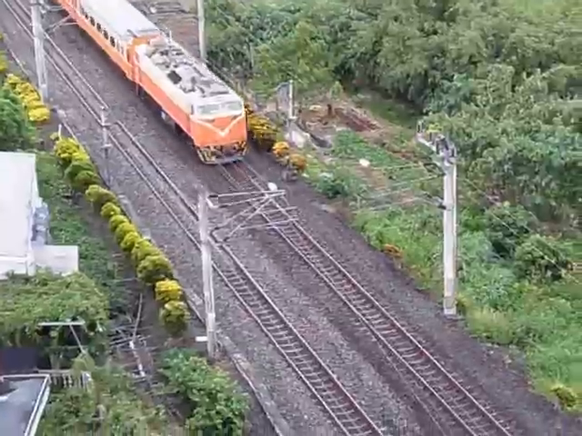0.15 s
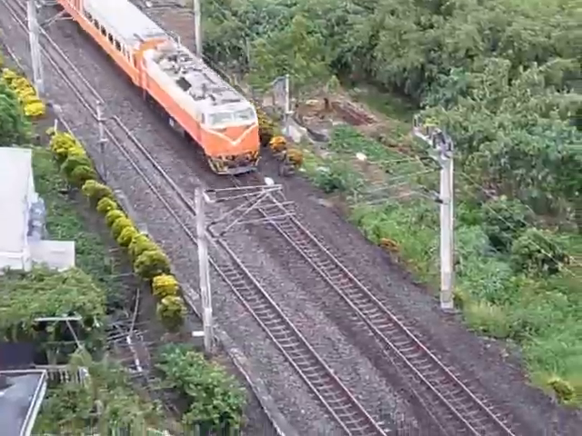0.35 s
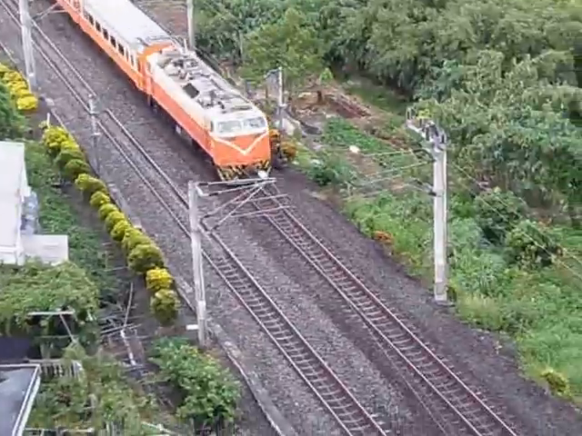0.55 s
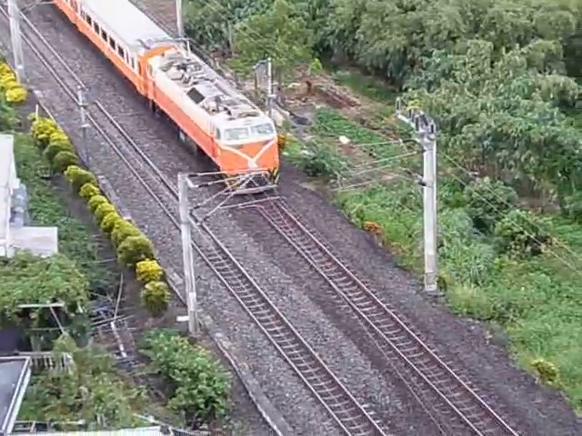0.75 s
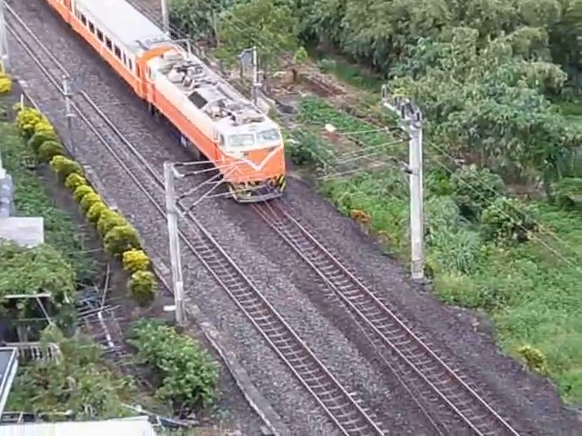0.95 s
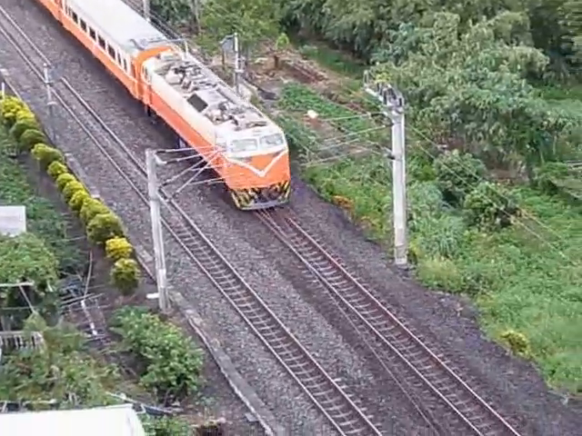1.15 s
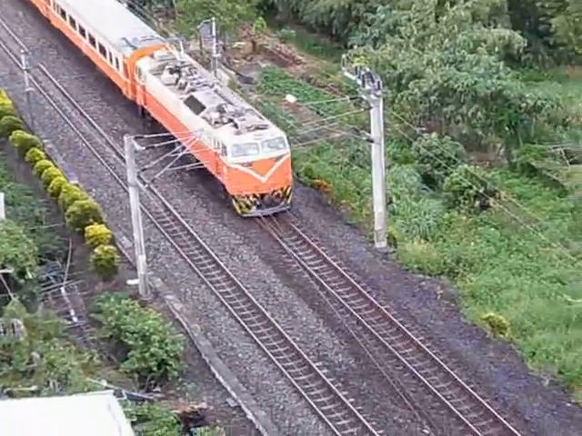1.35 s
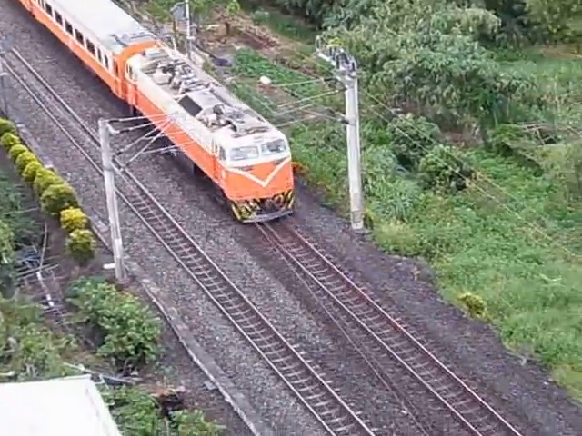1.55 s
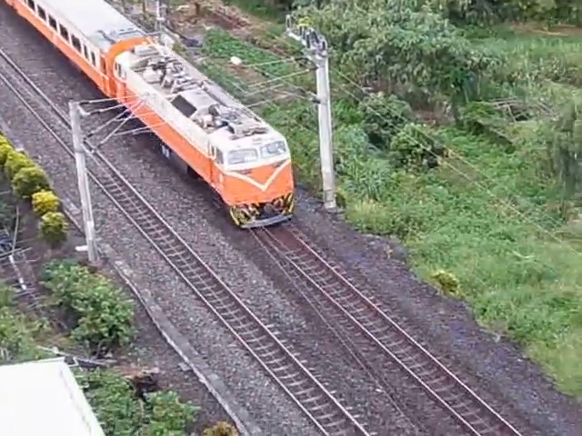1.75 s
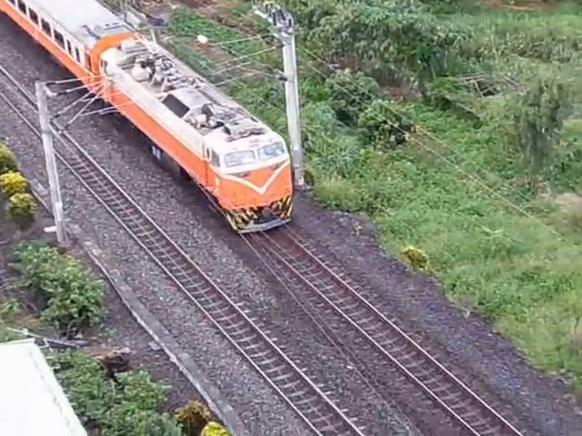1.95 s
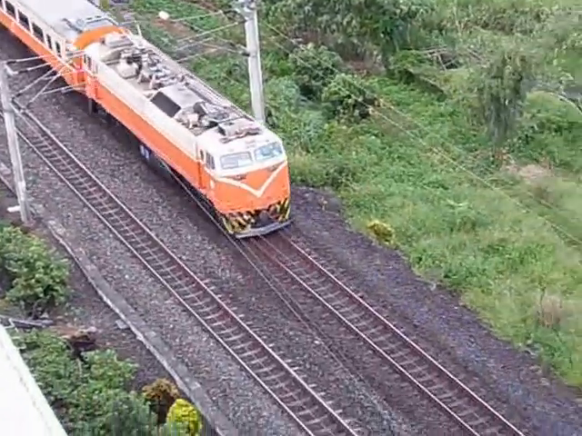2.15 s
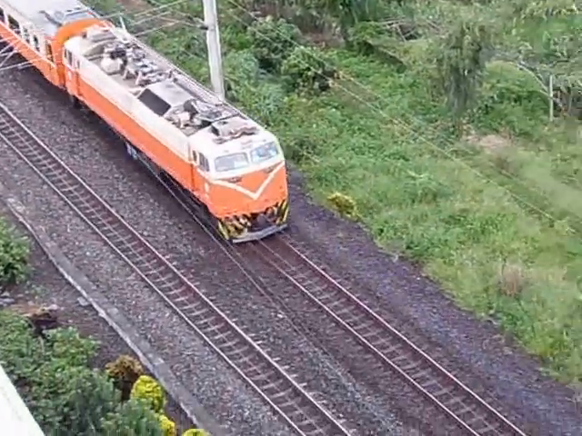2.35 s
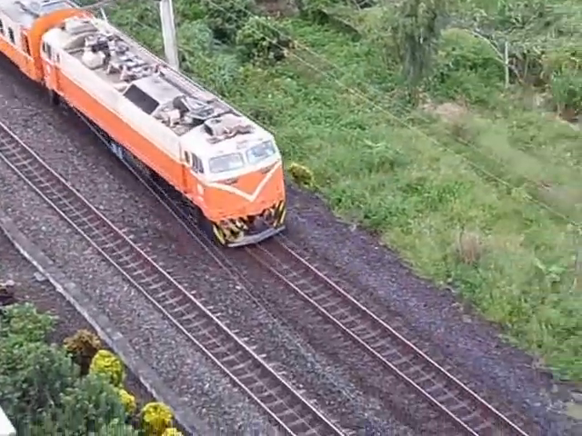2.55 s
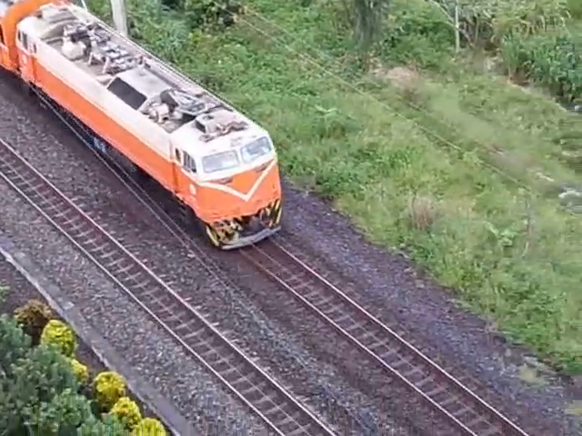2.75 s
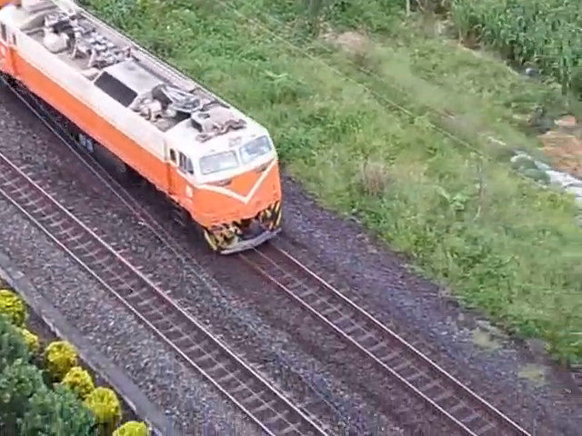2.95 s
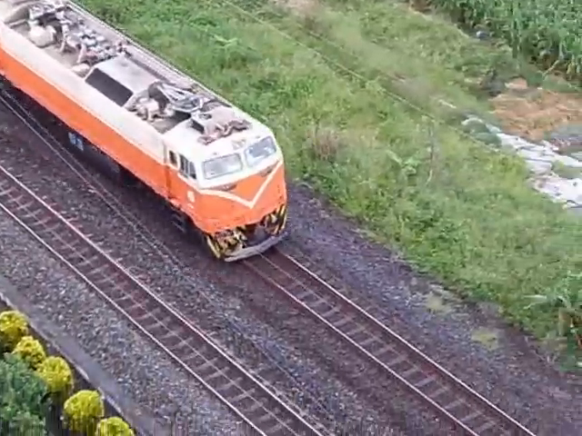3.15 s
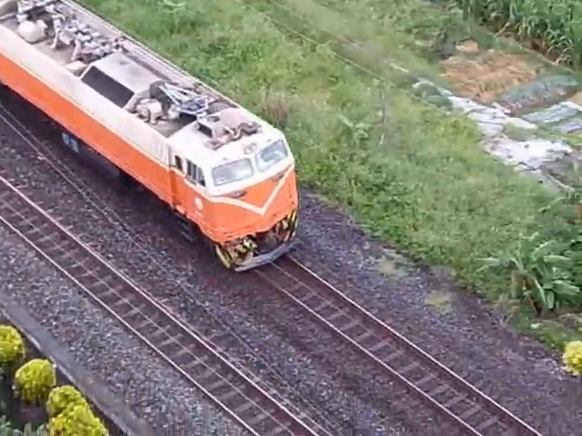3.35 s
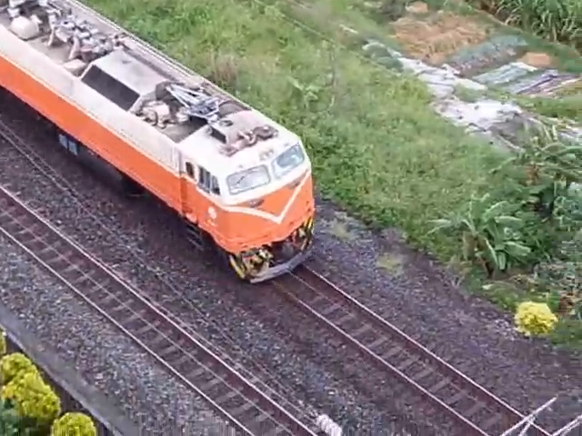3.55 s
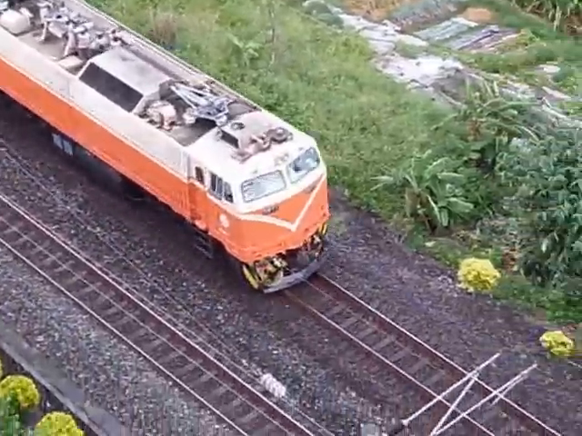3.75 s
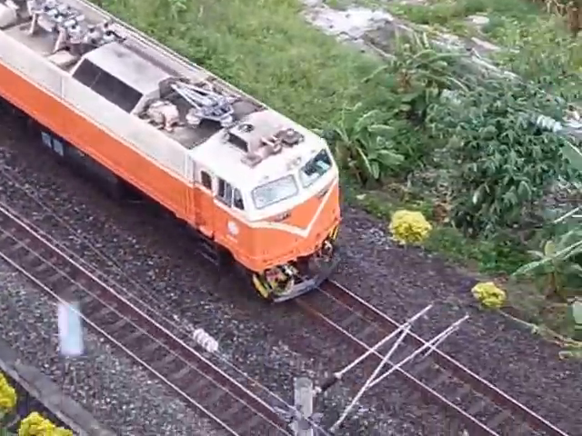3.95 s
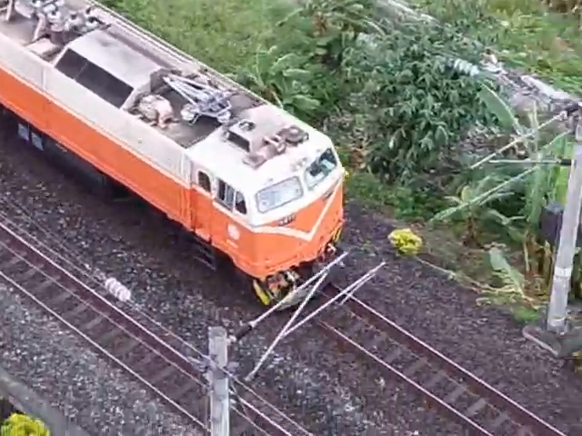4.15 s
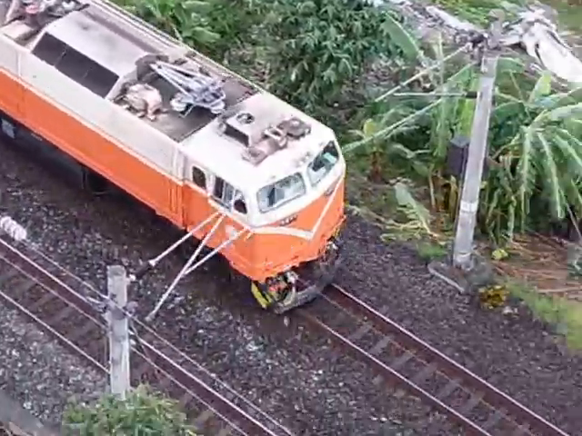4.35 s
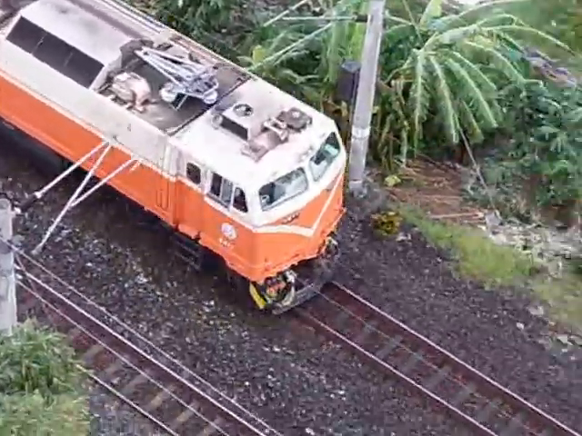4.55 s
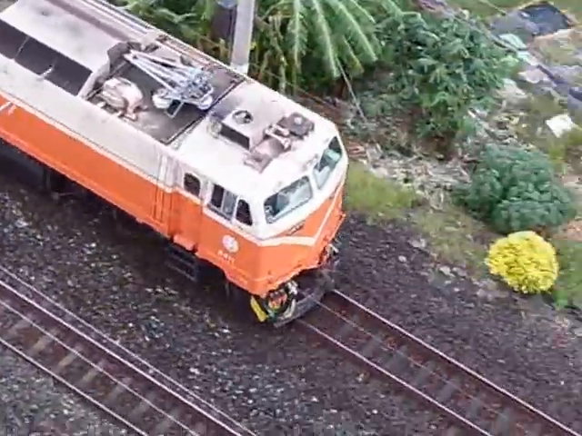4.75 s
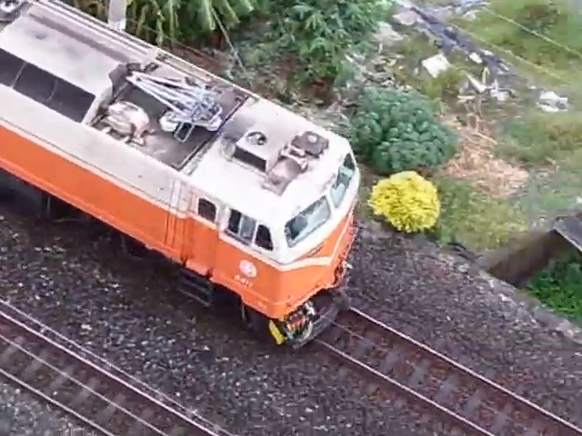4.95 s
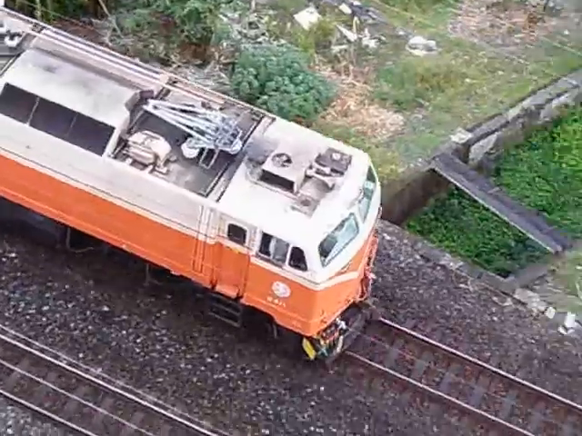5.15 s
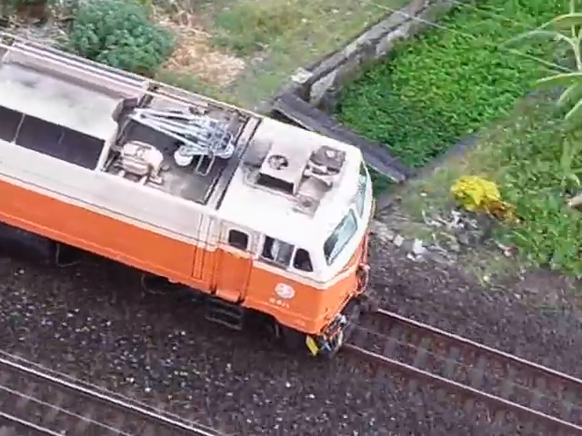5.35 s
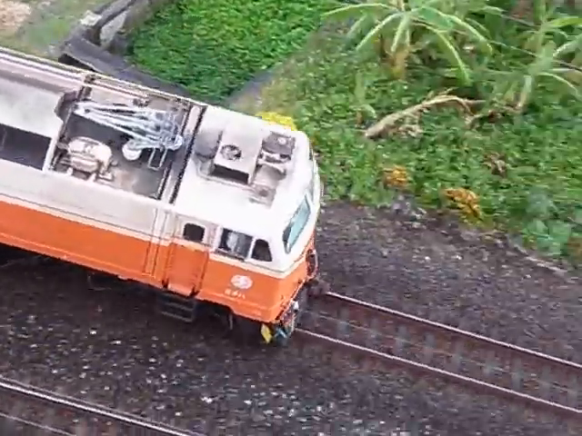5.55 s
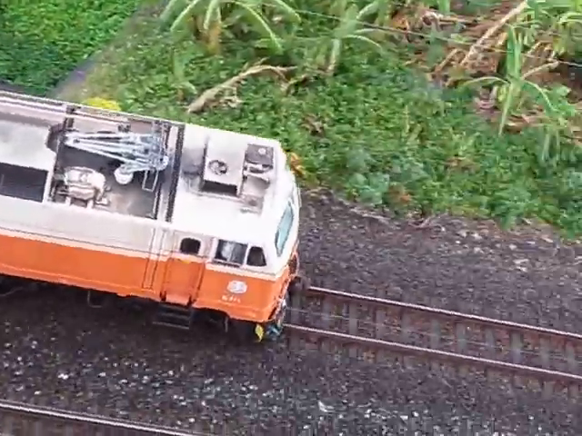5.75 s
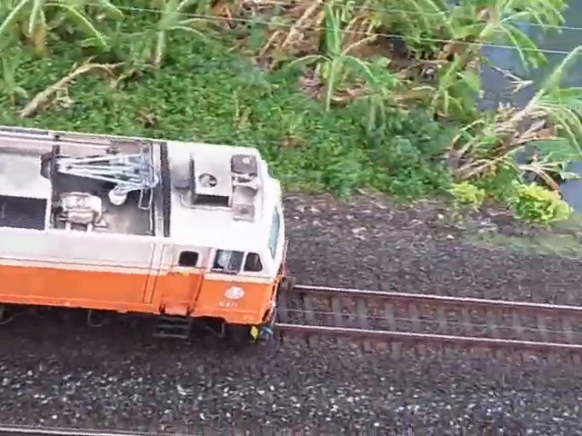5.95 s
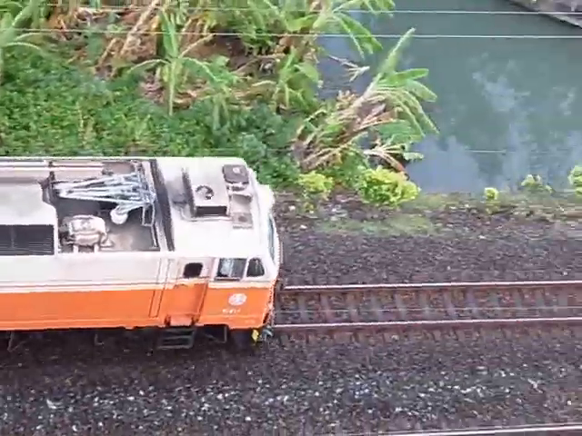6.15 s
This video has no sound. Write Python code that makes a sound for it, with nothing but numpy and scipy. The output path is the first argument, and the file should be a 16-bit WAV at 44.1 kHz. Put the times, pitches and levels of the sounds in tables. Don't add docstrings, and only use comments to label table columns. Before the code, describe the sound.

An electric train approaches on ballasted track, its rails singing and motors humming, swelling into a rough wheel roar with joint knocks and ticks.

```python
import sys
import numpy as np
from scipy import signal
from scipy.fft import rfft, irfft
from scipy.io import wavfile
from scipy.ndimage import uniform_filter1d, map_coordinates

SR = 44100
rng = np.random.default_rng(int(sys.argv[2]) if len(sys.argv) > 2 else 0)


def gain_from_decibels(decibels):
    exponent = np.asarray(decibels, float) / 20
    return 10 ** exponent


def store_wav(level_fs):
    pcm = np.round(np.clip(np.atleast_2d(level_fs), -1, 1) * 32767)
    wavfile.write(sys.argv[1], SR, pcm.T.astype(np.int16))


N = 276948


def rms_one(x):
    return x / np.sqrt(np.mean(x ** 2) + 1e-20)


def resonance(x, hz, width_hz):
    r = np.exp(-np.pi * width_hz / SR)
    zeros = np.array([1, 0, -1]) * (1 - r * r) / 2
    poles = [1, -2 * r * np.cos(2 * np.pi * hz / SR), r * r]
    return signal.lfilter(zeros, poles, x)


def narrow_noise(hz, width_hz, size):
    x = resonance(rng.standard_normal(size), hz, width_hz)
    x = rms_one(resonance(x, hz, 2 * width_hz))
    return rms_one(x / np.sqrt(uniform_filter1d(x * x, size=6000) + .08))


def waver(per_s, size):
    return np.interp(np.arange(size) / SR * per_s, np.arange(400), rng.standard_normal(400))


FRAME = 2048
EVENNESS = .5


def rolling_noise(spectrum, patchy_db, patch_s, patch_hz):
    hz, s, bins = signal.stft(rng.standard_normal(N + FRAME), SR, nperseg=FRAME)
    points = np.array(spectrum)
    colour_db = np.interp(np.log(hz + 1), np.log(points[:, 0]), points[:, 1], left=-150, right=-150)
    coarse = rng.standard_normal((200, 200))
    where = np.meshgrid(hz / patch_hz, s / patch_s, indexing="ij")
    patches = map_coordinates(coarse, where, order=1, mode="mirror")
    local = uniform_filter1d(np.abs(bins) ** 2, size=5, axis=0)
    local = uniform_filter1d(local, size=9, axis=1)
    even = bins / local ** (EVENNESS / 2)
    shaped = even * gain_from_decibels(colour_db[:, None] + patchy_db * patches)
    return rms_one(signal.istft(shaped, SR, nperseg=FRAME)[1][FRAME // 2:N + FRAME // 2])


# time_s, level_db
NEARNESS = [
    (0, -25),
    (1.2, -24),
    (2.4, -23),
    (3.8, -21.5),
    (4.4, -20),
    (5.0, -18),
    (5.7, -18),
    (6.28, -16.5),
]


def facing(turn, shadow_db):
    facing_s, level_db, rise, fall, round_db = turn
    t = np.arange(N) / SR
    late_s, round_db = t - facing_s, max(round_db, .3)
    lost_db = round_db * np.logaddexp(-rise * late_s / round_db, fall * late_s / round_db)
    near_s, near_db = np.transpose(NEARNESS)
    near = gain_from_decibels(np.interp(t, near_s, near_db) + level_db)
    return near * np.hypot(gain_from_decibels(-lost_db), gain_from_decibels(-shadow_db))


def flares(events, sharpness):
    t, out = np.arange(-SR, SR) / SR, np.zeros(N + 3 * SR)
    for peak_s, half_s, hz, db in events:
        at = round(peak_s * SR)
        swell = np.exp(-(t / min(half_s, .5)) ** 2)
        out[at:at + 2 * SR] += gain_from_decibels(db) * narrow_noise(hz, hz / sharpness, size=2 * SR) * swell
    return out[SR:SR + N]


def blows(events, trim_db, decay_s, cycles):
    t, out = np.arange(4096) / SR, np.zeros(N + 4096)
    for (start_s, db, hz), noise in zip(events, rng.standard_normal((len(events), 4096))):
        strike = noise + .25 * np.sin(2 * np.pi * hz * t)
        burst = resonance(strike * t * np.exp(-t / decay_s), hz, hz / cycles)
        burst = resonance(burst, hz, hz / 4)
        at = round(start_s * SR)
        out[at:at + 4096] += gain_from_decibels(db + trim_db) * burst / np.abs(burst).max()
    return out[:N]


# freq_hz, density_db_per_hz
RAIL = [(880, -32), (1500, -3), (1770, -10), (1790, -8.5), (2020, -3.5), (2280, -3.5), (2380, -4),
        (2610, -22.5), (2850, -9), (3090, -11), (3520, -3.5), (3990, -9.5), (4330, -5.5), (4720, -18),
        (5500, -19), (7150, -61.5), (12100, -120)]
OBLIQUE = [(880, -41), (1500, -24.5), (1640, -16), (1990, -4.5), (2060, -4.5), (2280, -0.5), (2470, -10.5),
           (2800, -2.5), (3250, -7.5), (3740, -15.5), (4080, -7), (4280, -11), (4430, -26), (5010, -17.5),
           (5500, -26.5), (7150, -58.5), (12100, -120)]
CLOSING = [(880, -29), (1500, -4.5), (1960, 0), (2380, -2.5), (2710, -1.5), (3110, -9), (3450, -4),
           (3720, -9), (4170, -4), (4520, -10.5), (4830, -12.5), (5500, -18.5), (7150, -44), (12100, -120)]
BROADSIDE = [(880, -32), (1500, -5.5), (1970, -2), (2340, -6), (2540, -1), (2790, 1.5), (3190, -4),
             (3460, -3), (3740, -11), (4030, -4.5), (4350, -10.5), (4700, -8.5), (5500, -21), (7150, -52),
             (12100, -120)]
# facing_s, level_db, rise_db_per_s, fall_db_per_s, round_db
RAIL_TURN = (3.0, -4.5, 0, 15.5, 3.5)
OBLIQUE_TURN = (4, -3, 3, 25, 4)
CLOSING_TURN = (4.996, 4.17, 11.1, 15.6, 10.9)
BROADSIDE_TURN = (5.5, -1.5, 21, 3, 4.5)
WHEEL_SHADOW_DB = 25.5


def wheels_and_rails():
    out = np.zeros(N)
    for turn, colour in ((RAIL_TURN, RAIL), (OBLIQUE_TURN, OBLIQUE),
                         (CLOSING_TURN, CLOSING), (BROADSIDE_TURN, BROADSIDE)):
        noise = rolling_noise(colour, patchy_db=0.53, patch_s=0.15, patch_hz=152.4)
        out += facing(turn, WHEEL_SHADOW_DB) * noise
    return out


# freq_hz, density_db_per_hz
DRONE = [(59, -49.5), (100, -25.5), (151, -15), (216, -0.5), (261, -12.5), (284, -4), (382, -11.5),
         (430, -2.5), (478, -10), (507, -7), (659, -6), (1080, 0.5), (1280, -2.5), (1440, -1), (1700, -22),
         (2210, -41), (3740, -120)]
NEAR_DRONE = [(290, -24.5), (500, -0.5), (534, -3), (607, 0), (813, -1), (1030, -4), (1280, -4.5),
              (1400, -6), (1700, -14), (2210, -31.5), (3740, -120)]
RUMBLE = [(100, -36), (170, -1.5), (230, -1.5), (300, 2), (380, 0.5), (460, 1.5), (560, -13), (730, -42),
          (1230, -120)]
# facing_s, level_db, rise_db_per_s, fall_db_per_s, round_db
FAR_DRONE_TURN = (2.5, -4, 0.4, 9, 2.5)
NEAR_DRONE_TURN = (3.5, -4.5, 2.5, 1, -1.5)
BOGIE_TURN = (3.0, -6.5, 8.5, -0.2, 5)
BODY_SHADOW_DB = 18


def underframe():
    far = rolling_noise(DRONE, patchy_db=0.2, patch_s=0.054, patch_hz=157)
    near = rolling_noise(NEAR_DRONE, patchy_db=-0.5, patch_s=.1, patch_hz=68.8)
    bogies = rolling_noise(RUMBLE, patchy_db=0.0, patch_s=0.075, patch_hz=51.7)
    drone = facing(FAR_DRONE_TURN, WHEEL_SHADOW_DB) * far + facing(NEAR_DRONE_TURN, BODY_SHADOW_DB) * near
    return drone + facing(BOGIE_TURN, BODY_SHADOW_DB) * bogies


def shimmer():
    depth_db, per_s = 0.2, 12
    steps = rng.standard_normal(200)
    return gain_from_decibels(depth_db * map_coordinates(steps, [np.arange(N) / SR * per_s], order=3))


# freq_hz, density_db_per_hz
AIR = [(8.8, -29), (15, 1), (19, -9.5), (27, -30), (60, -5.5), (78, -47), (130, -120)]
THRUM_COLOUR = [(26, -45), (45, -21.5), (95, -2), (135, -0.5), (170, -7), (220, -30.5), (370, -120)]
# facing_s, level_db, rise_db_per_s, fall_db_per_s, round_db
BALLAST_TURN = (5, -19.5, 11, 0.7, -1.5)
# peak_s, half_length_s, pitch_hz, rms_db
GROUND_SURGES = [
    (3.4, 0.11, 130, -48),
    (4.4, .15, 128, -34),
    (5.09, 0.087, 120.5, -46),
    (5.55, 0.28, 120.6, -32),
    (6.2, 0.064, 123.4, -39),
]
AIR_DB, GROUND_SHADOW_DB = -53.5, 7


def ground():
    thrum = rolling_noise(THRUM_COLOUR, patchy_db=0.5, patch_s=0.15, patch_hz=40)
    thrum = facing(BALLAST_TURN, GROUND_SHADOW_DB) * thrum
    breeze = gain_from_decibels(AIR_DB) * rolling_noise(AIR, patchy_db=2.5, patch_s=0.24, patch_hz=40)
    return thrum + flares(GROUND_SURGES, sharpness=1.2) + breeze


# start_s, end_s, pitch_hz, width_hz
TONE_LINES = [(0, 2.8, 624, 3), (3.45, 3.85, 619, 5), (3.95, 4.45, 616, 5), (5.55, 6.05, 597, 2),
              (.1, .3, 445, 8), (.9, 1.3, 431, 5), (1.7, 1.95, 436, 8), (2.25, 2.45, 457, 8),
              (2.45, 2.65, 419, 6), (3.05, 3.3, 420, 4), (3.05, 3.45, 452, 9), (5.45, 5.75, 434, 6),
              (5.45, 5.65, 458, 6), (.7, 1.4, 218, 6), (1.8, 2.05, 215, 5), (1.3, 1.85, 291, 3),
              (2.85, 3.4, 290, 8), (3.1, 3.75, 333, 6), (4.3, 4.6, 262, 10), (5.2, 5.4, 263, 4),
              (5.55, 5.75, 258, 4), (.3, 1.5, 697, 5), (1.3, 2.3, 985, 10), (0, .9, 1064, 18),
              (1.75, 2.05, 1065, 6), (2.4, 2.65, 1055, 14), (2.8, 3.05, 1045, 5), (0, 2.7, 438, 9),
              (3.5, 4.3, 1164, 9), (5.0, 5.25, 1255, 20), (5.25, 5.4, 958, 9), (5.7, 5.85, 1254, 6),
              (5.75, 5.95, 1087, 8), (2.2, 2.45, 764, 6), (3.5, 3.9, 800, 16), (4.4, 4.6, 815, 14),
              (5.75, 5.95, 807, 14), (6.1, 6.4, 678, 6), (4.35, 4.55, 500, 5), (2.1, 2.3, 511, 8),
              (3.6, 6.4, 120, 4),
              (2.6, 4.5, 2103, 14), (2.3, 2.85, 2325, 18), (3.1, 4.8, 2285, 20), (1.7, 2.5, 1460, 18),
              (2.1, 3.1, 3550, 30), (4.75, 5.4, 3470, 45), (5.7, 5.95, 3447, 35), (5.8, 6.1, 2545, 35),
              (0, .5, 3480, 25), (.2, 2.3, 2320, 20), (.1, 1.2, 1860, 15), (.3, 1.2, 2915, 25),
              (1.2, 2.1, 4330, 30), (4.3, 4.78, 2085, 30), (.1, 1.7, 1490, 14), (.9, 1.75, 1055, 14),
              (1.5, 1.55, 2310, 20), (2.68, 2.72, 3600, 25), (.5, 1.2, 3500, 30), (4.8, 5.35, 330, 14),
              (4.85, 5.3, 410, 12)]
HUM_DB = [-44, -37, -34.5, -34, -48, -41, -43, -38, -37.5, -41, -32.5, -28, -35, -49, -41.5, -46.5, -39,
          -36, -33, -34.5, -33, -42.5, -43.5, -39, -40, -39, -48, -48.5, -41.5, -36.5, -33.5, -35, -36.5,
          -45, -42, -40, -36, -34.5, -38, -42, -52, -36, -37.5, -38.5, -39, -43, -35.5, -35, -35, -45, -41,
          -42.5, -45.5, -48.5, -35, -44.5, -44.5, -38, -40, -43.5, -36.5, -37.5]
HUM_FLICKER_DB, HUM_FADE_S = 1.5, .15
WAVER_SHARE = 0.607
CLEAN_HZ, GRAIN_SPEED = 7, 3.5


def hums():
    t, out = np.arange(N) / SR, np.zeros(N)
    for (start, end, hz, width_hz), db in zip(TONE_LINES, HUM_DB):
        span = slice(max(round((start - .3) * SR), 0), round((end + .3) * SR))
        in_view = np.interp(t[span], [start - HUM_FADE_S, start, end, end + HUM_FADE_S], [0, 1, 1, 0])
        size = len(in_view)
        pitch_hz = hz + WAVER_SHARE * width_hz * waver(4 + width_hz, size)
        phase = 2 * np.pi * np.cumsum(pitch_hz) / SR
        share = width_hz ** 2 / (width_hz ** 2 + CLEAN_HZ ** 2)
        grain = [waver(GRAIN_SPEED * width_hz, size) for _ in range(2)]
        swing = np.sqrt(1 - share) + np.sqrt(share * .75) * (grain[0] + 1j * grain[1])
        level = np.sqrt(2) * gain_from_decibels(db + HUM_FLICKER_DB * waver(5.87, size)) * in_view
        out[span] += level * np.imag(swing * np.exp(1j * phase))
    return out


# start_s, peak_db, pitch_hz
TICKS = [
    (0.1217, -24, 2096),
    (1.3522, -18.5, 3600),
    (1.5384, -14.5, 2260),
    (3.7888, -13.5, 2160),
    (3.9739, -15.5, 2265),
    (4.1702, -13, 2410),
    (4.4835, -8.5, 2206),
    (5.257, -11, 1870),
]


def ticks():
    return blows(TICKS, trim_db=-3.5, decay_s=0.0047, cycles=2.2)


# peak_s, half_length_s, pitch_hz, rms_db
WHEEL_FLARES = [(.8, 0.25, 1394, -36.5), (1.3, 0.44, 1038, -43), (2.8, .45, 2175, -38.5),
                (3.85, 0.32, 2775, -32), (4.1, 0.25, 4220, -47.5), (4.35, 0.26, 2260, -29.5),
                (4.55, 0.29, 2020, -30.5), (4.7, 0.54, 1777, -36.5), (5.2, 0.4, 3450, -33),
                (5.35, 0.22, 1914, -33.5), (5.2, 0.084, 1263, -40), (5.6, 0.18, 2030, -33),
                (5.7, 0.32, 2950, -31), (5.75, 0.15, 2910, -29.5), (5.8, 0.17, 3560, -30.5),
                (6.0, 0.31, 2605, -31), (5.05, 0.13, 2840, -33), (5.5, 0.058, 2800, -33.5),
                (6.17, 0.17, 2800, -28), (2.9, 0.27, 1070, -33.5), (5.95, 0.17, 990, -28),
                (6.15, 0.1, 979, -27), (6.15, 0.14, 1178, -32)]


def wheel_flares():
    return flares(WHEEL_FLARES, sharpness=13)


# peak_s, half_length_s, pitch_hz, rms_db
BODY_FLARES = [(1.2, 0.12, 560, -49), (2.4, 0.41, 754, -36.5), (2.2, 0.15, 417, -35),
               (3.4, 0.071, 560, -36), (3.7, 0.26, 330, -40), (3.1, 0.26, 538, -35.5),
               (3.7, .25, 816, -38.5), (3.8, 0.099, 547, -30), (3.95, 0.16, 500, -32),
               (4.35, 0.14, 192, -40), (5.6, 0.22, 390, -33), (4.7, 0.081, 680, -39), (6, 0.16, 305, -35.5),
               (3.3, 0.1, 266.5, -35.5), (4.3, 0.18, 310, -32.5), (5.95, 0.065, 290, -38.5),
               (6.2, 0.16, 415, -34.5), (6.2, 0.056, 190, -29), (6.8, 0.17, 415, -32),
               (5.3, 0.15, 470, -35), (5.5, 0.092, 210, -33), (5.5, 0.12, 640, -35.5),
               (1.8, 0.074, 425, -34)]


def body_flares():
    return flares(BODY_FLARES, sharpness=16)


# start_s, peak_db, pitch_hz
KNOCKS = [(2.737, -21, 760), (2.886, -13.5, 415), (2.968, -28, 535), (3.115, -13.5, 460),
          (3.229, -13.5, 350), (3.397, -16, 312), (3.485, -8.5, 623), (3.593, -10, 611),
          (4.341, -13.5, 310), (4.658, -7.5, 438), (5.198, -17.5, 457), (5.431, -26.5, 460),
          (5.592, -16, 422), (5.974, -25, 349), (6.083, -15, 414), (6.167, -7, 252)]


def knocks():
    return blows(KNOCKS, trim_db=-8, decay_s=0.0051, cycles=3.0)


def scene():
    roar = shimmer() * (wheels_and_rails() + underframe()) + ground()
    joints = ticks() + knocks()
    ringing = wheel_flares() + body_flares()
    return (roar + hums() + joints + ringing)[None]


def roll_off(x):
    return signal.sosfilt(signal.butter(12, 7300, fs=SR, output="sos"), x)


# freq_hz, gain_db
IMAGE = [(5512, -0.5), (5750, -5), (6000, -11.5), (6500, -23), (6800, -35), (7000, -41.5), (7300, -60.5),
         (7500, -98)]
THINNING = 4
OFFSET, ROUNDING_DB = .015, -101


def record(dry):
    hz = np.fft.rfftfreq(N, 1 / SR)
    slow = irfft(rfft(dry) * (hz < SR / THINNING / 2), N)
    stuffed = THINNING * slow * (np.arange(N) % THINNING == 0)
    points = np.array(IMAGE)
    gain_db = np.interp(hz, points[:, 0], points[:, 1], right=-160)
    smooth = irfft(rfft(stuffed) * gain_from_decibels(gain_db), N)
    hiss = gain_from_decibels(ROUNDING_DB) * rng.standard_normal(N)
    return roll_off(smooth + OFFSET + hiss)


dry = scene()
out = record(dry)
store_wav(out)
```